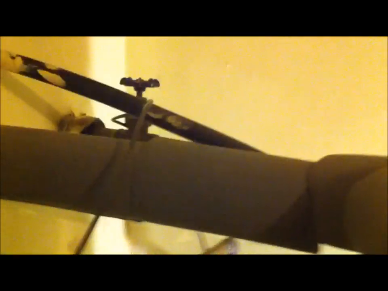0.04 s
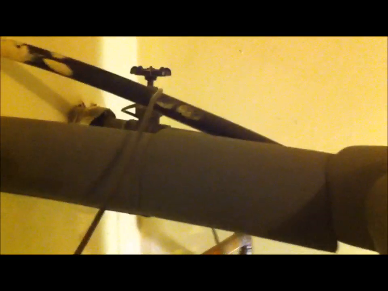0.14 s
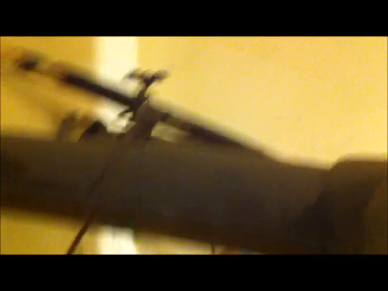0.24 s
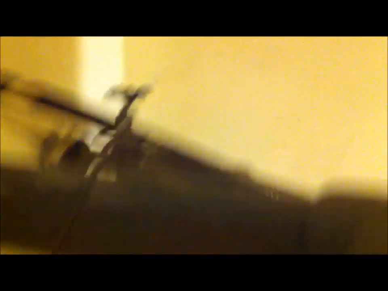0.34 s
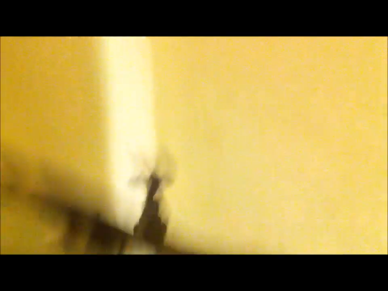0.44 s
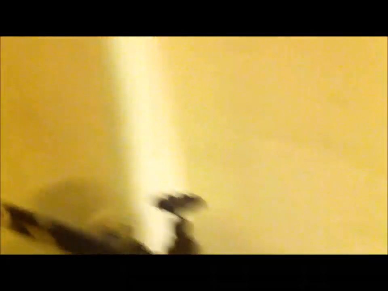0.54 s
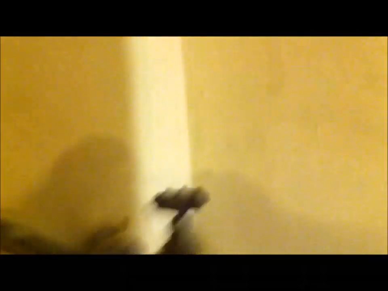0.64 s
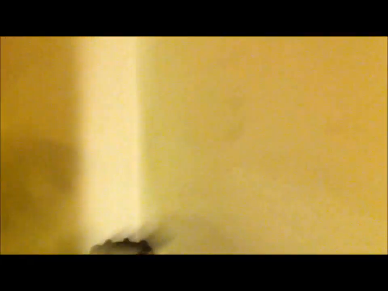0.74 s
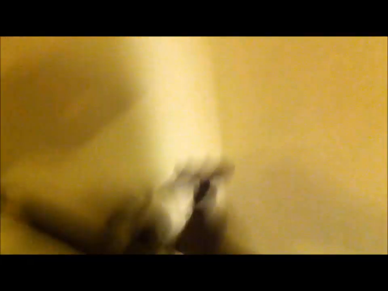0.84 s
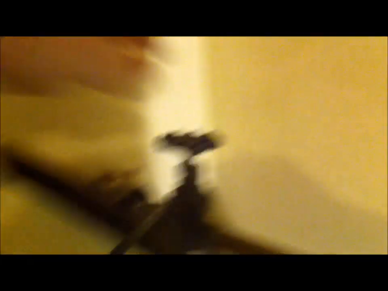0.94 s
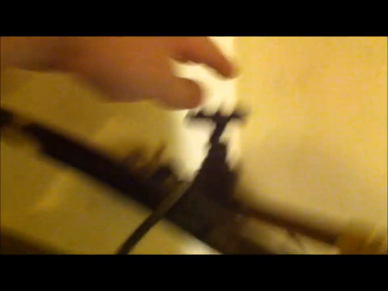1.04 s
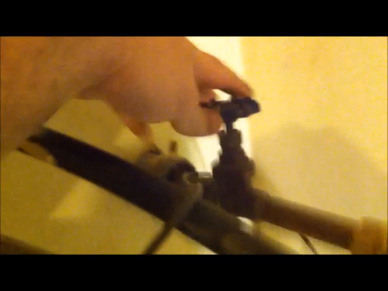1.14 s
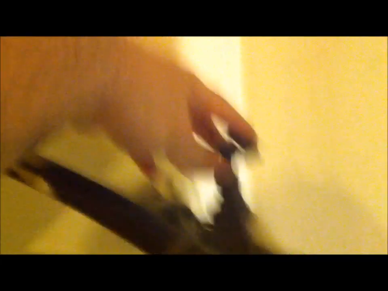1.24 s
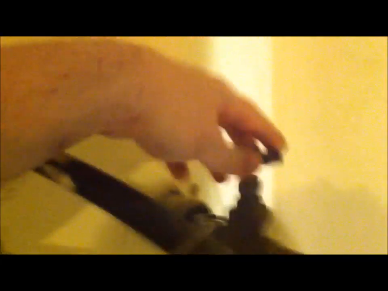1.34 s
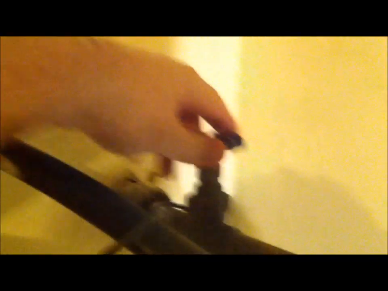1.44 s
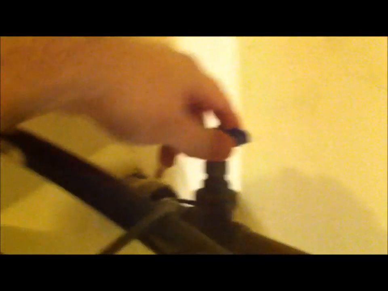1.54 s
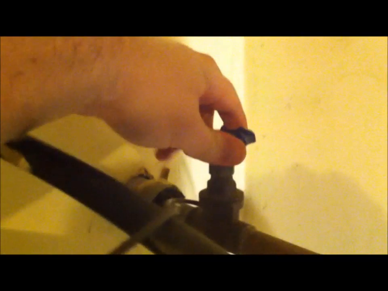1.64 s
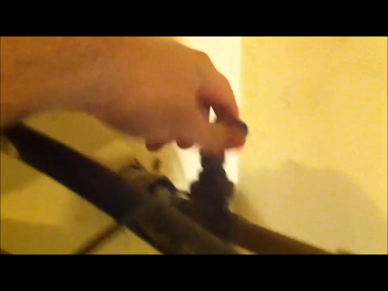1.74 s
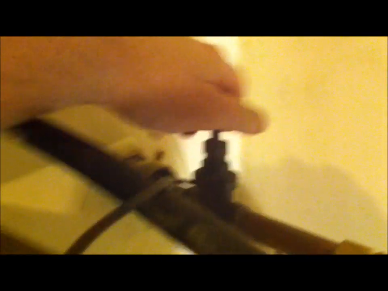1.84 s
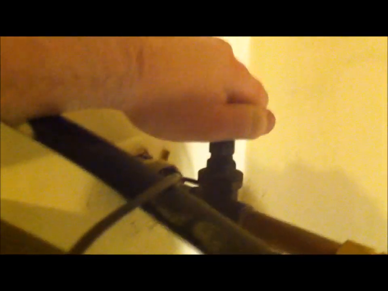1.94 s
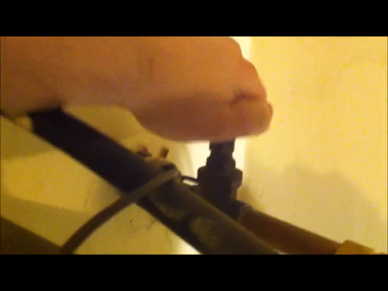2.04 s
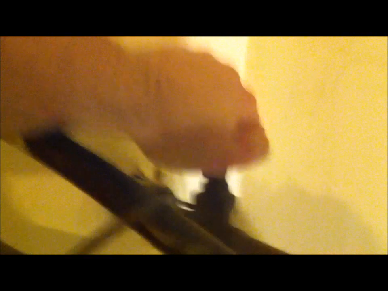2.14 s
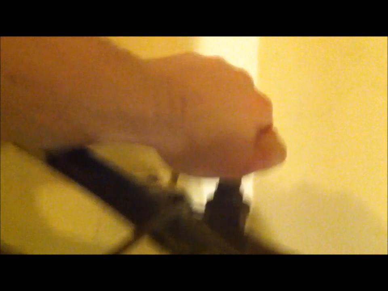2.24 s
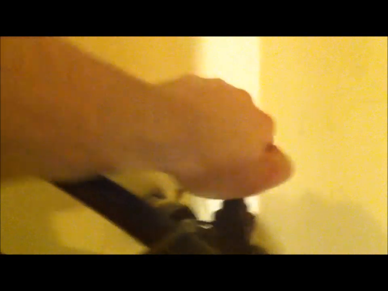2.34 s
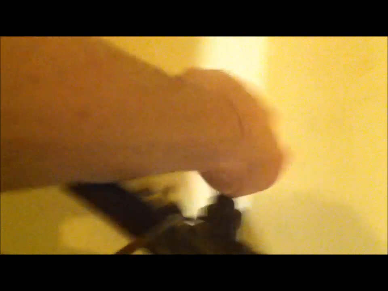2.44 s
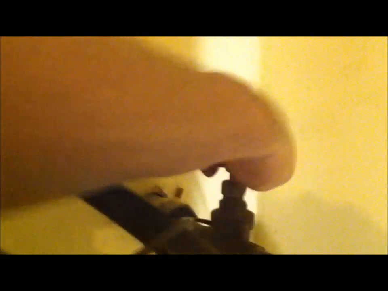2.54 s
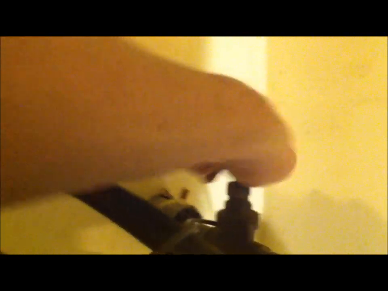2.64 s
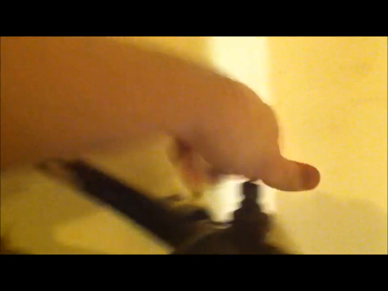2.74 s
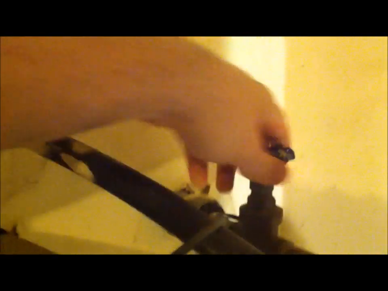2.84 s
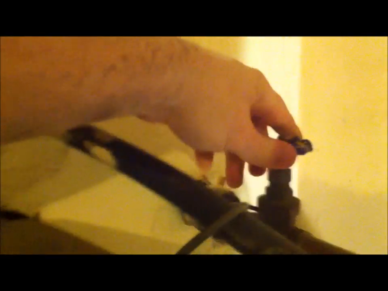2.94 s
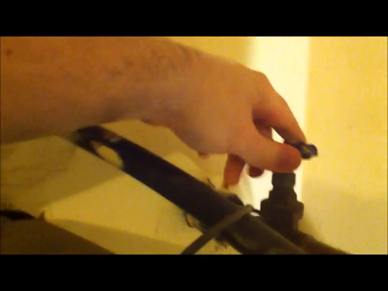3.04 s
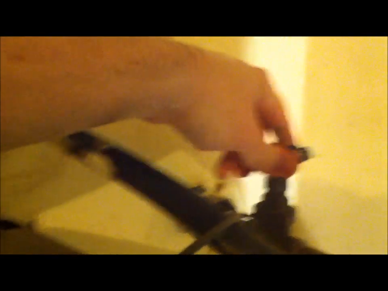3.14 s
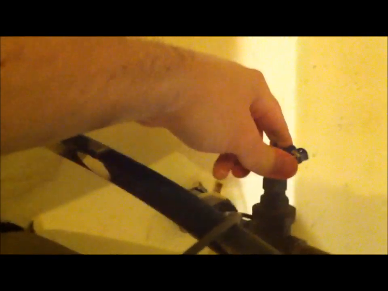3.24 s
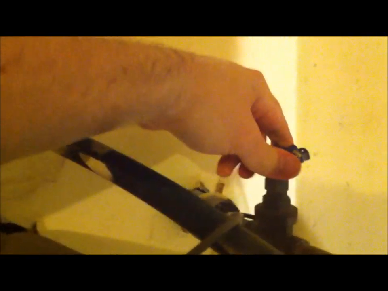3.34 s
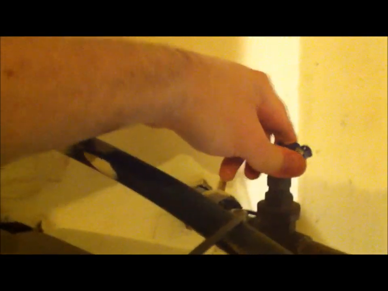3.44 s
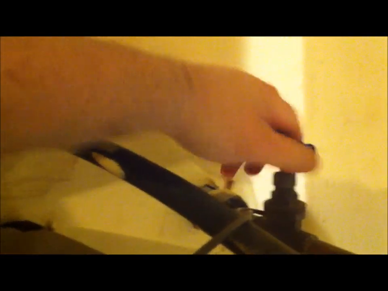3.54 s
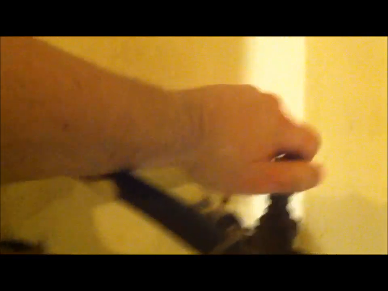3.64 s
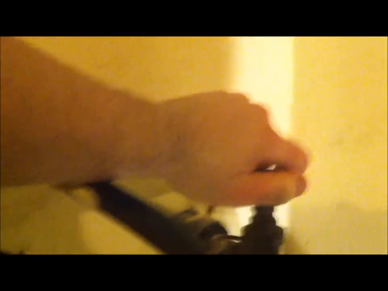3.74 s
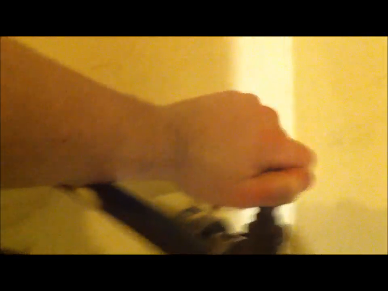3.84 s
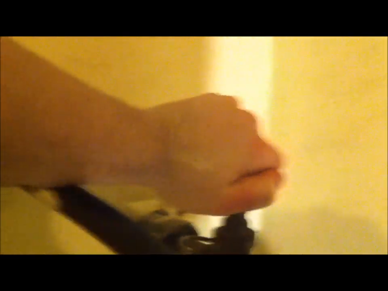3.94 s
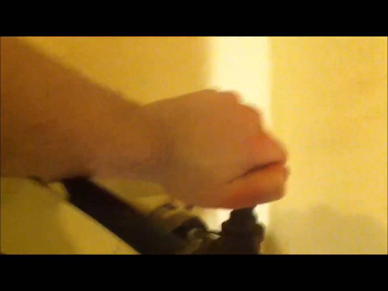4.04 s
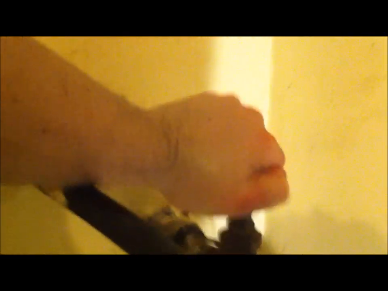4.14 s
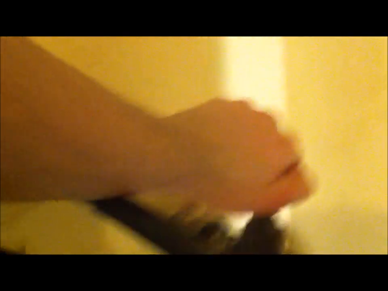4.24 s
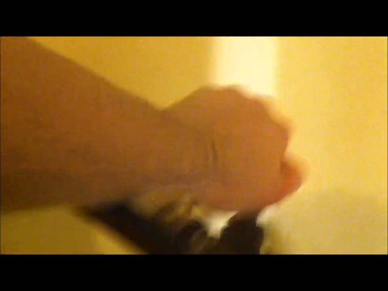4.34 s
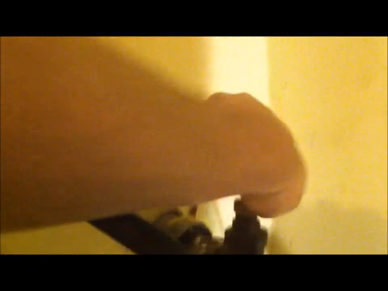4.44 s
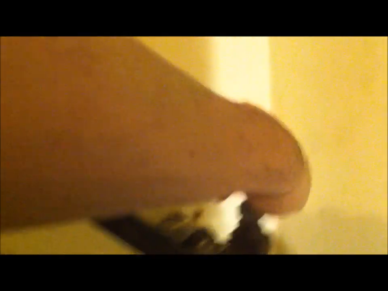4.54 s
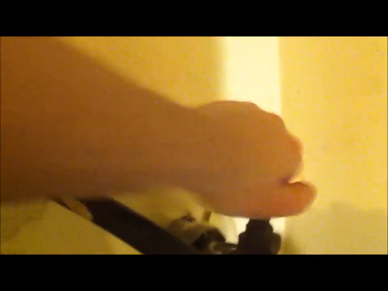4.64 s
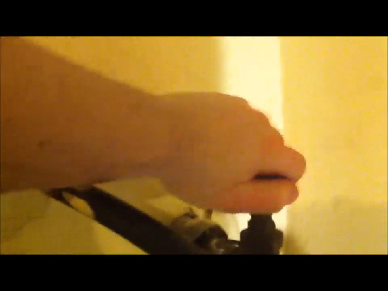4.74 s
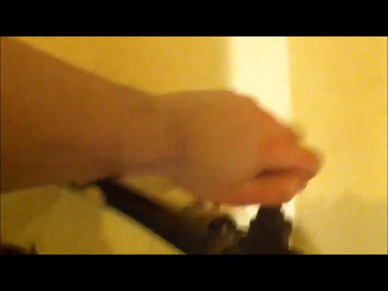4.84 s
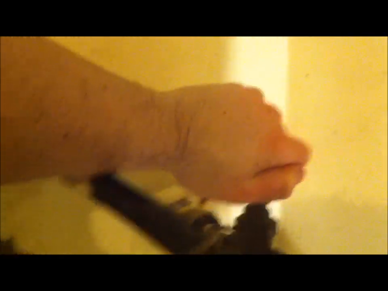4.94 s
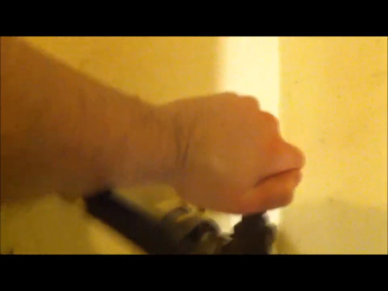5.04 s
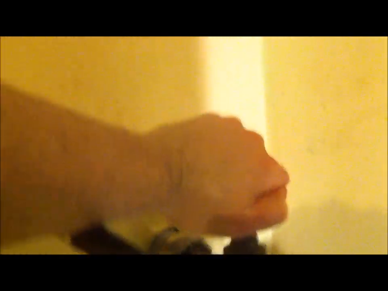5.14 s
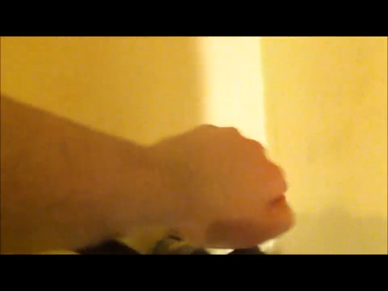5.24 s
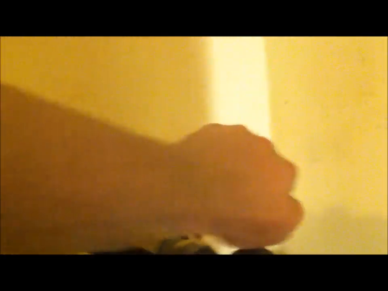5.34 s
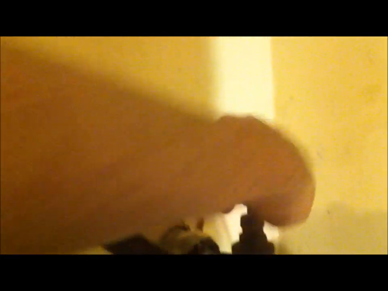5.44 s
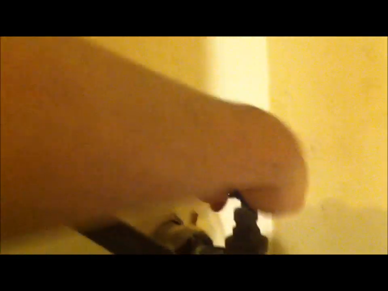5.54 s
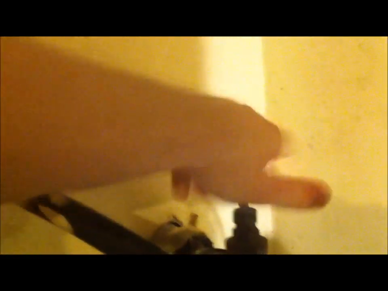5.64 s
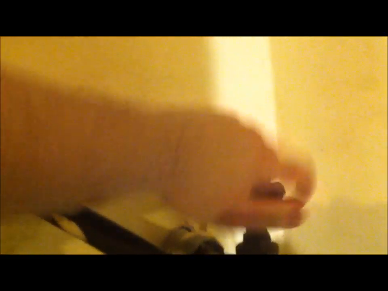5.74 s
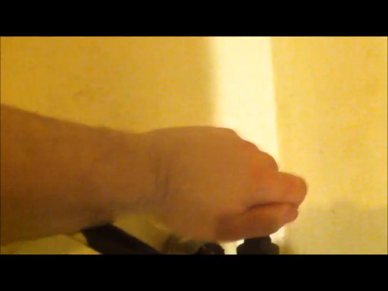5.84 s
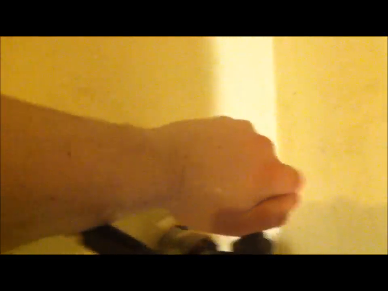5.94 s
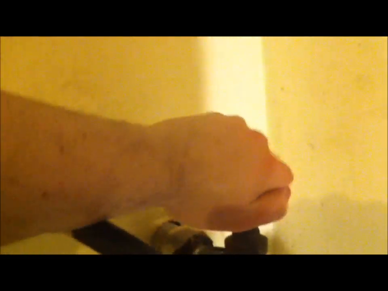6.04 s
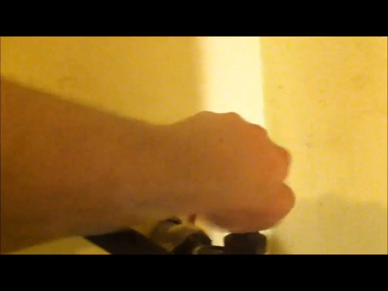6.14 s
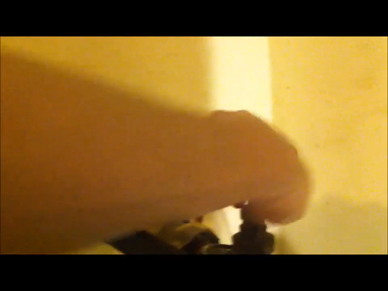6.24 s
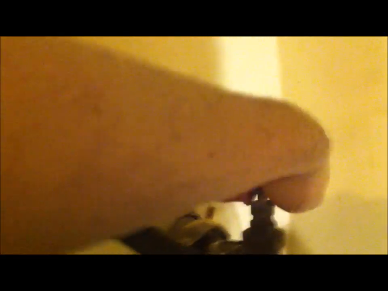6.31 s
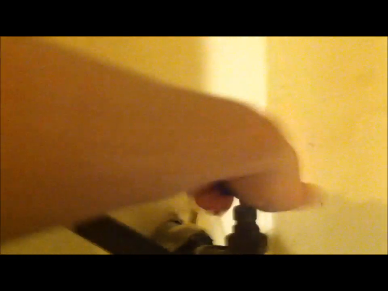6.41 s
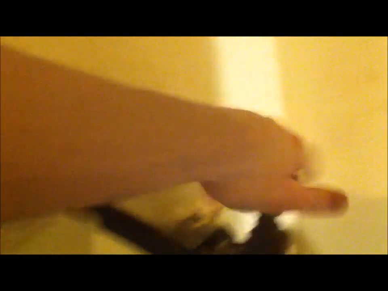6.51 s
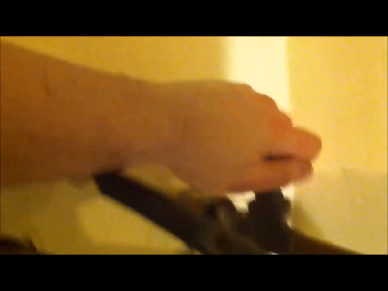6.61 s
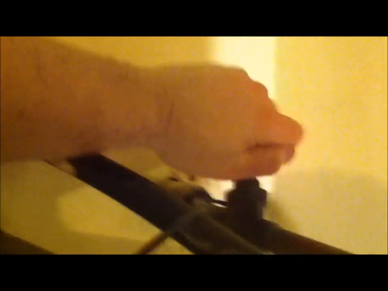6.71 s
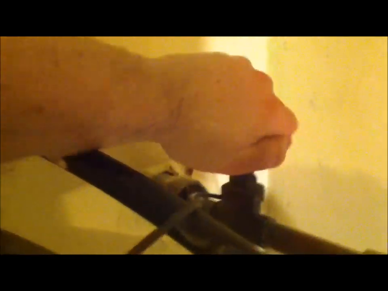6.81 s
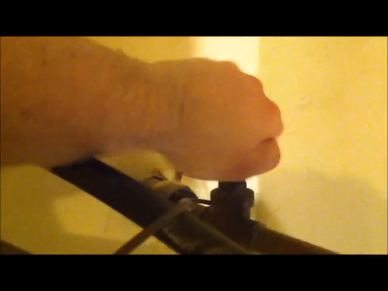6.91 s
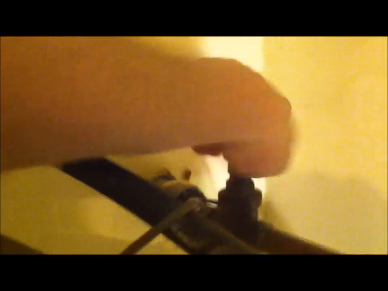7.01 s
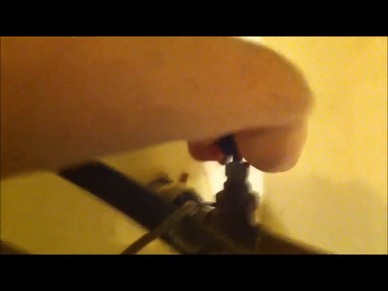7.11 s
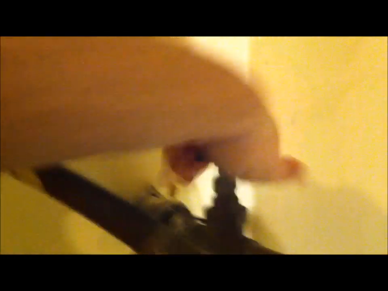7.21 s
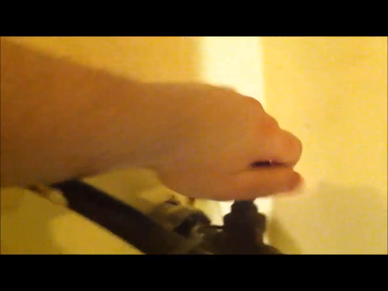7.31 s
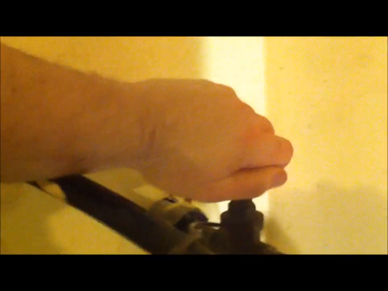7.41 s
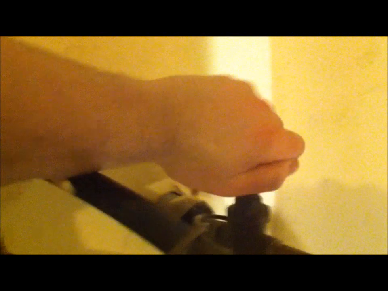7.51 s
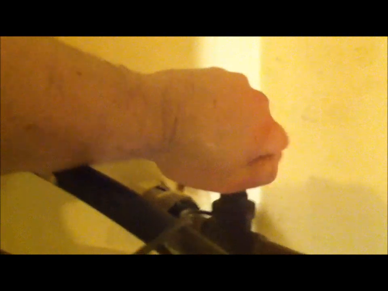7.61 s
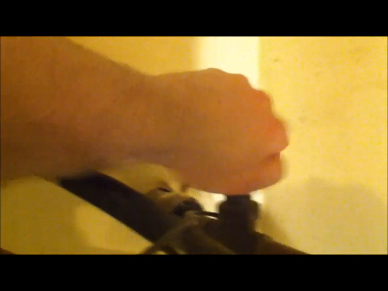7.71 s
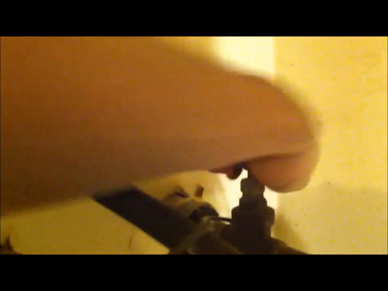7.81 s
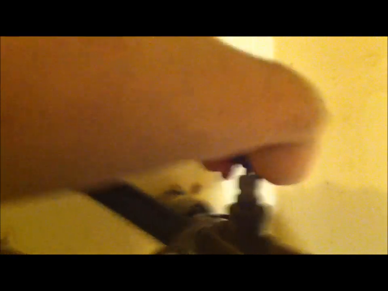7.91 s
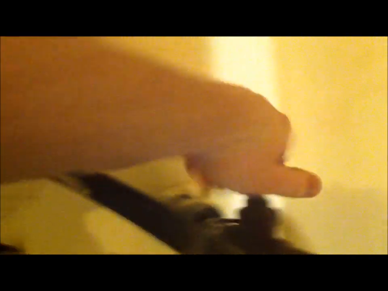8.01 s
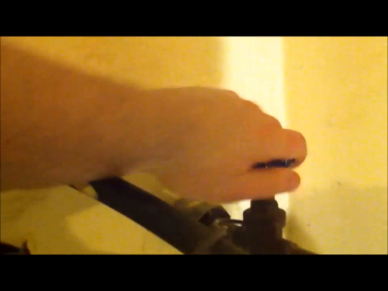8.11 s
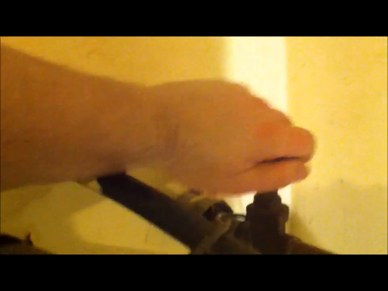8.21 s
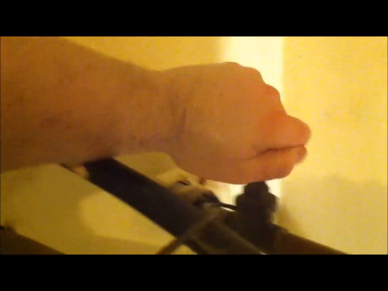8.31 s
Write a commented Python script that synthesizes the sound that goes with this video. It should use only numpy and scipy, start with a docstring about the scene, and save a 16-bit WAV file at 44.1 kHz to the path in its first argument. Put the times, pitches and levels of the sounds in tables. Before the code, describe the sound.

A hand-held microphone near a water valve catches a hollow knock with bright cracks, faint hissing seepage, and sparse metallic taps, bumps and rubs. After about four seconds the valve opens: a harsh jet hisses, whistles and swells into a resonant pipe roar, dips and sputters, then cuts away to low churning water with bubbles and small gulps. Reflective little room, no voices.

```python
"""In a small hard-walled room, close to a microphone, a hand turns the tap of a water valve.
Pipes clatter (struck modes, noise cracks); a thin hiss (resonant noise) stops once the hand takes hold.
Handle taps, clicks, bumps and rubs are struck modes and filtered noise bursts; one pop is a filtered impulse.
A noise jet then roars in the pipe's modes, hisses and whistles at the seat, with short sung notes.
It dies to a softer churning flow: coloured noise, gliding bubbles and gulps. Both channels are the same."""
import sys
import numpy as np
from scipy import signal
from scipy.fft import rfft, irfft
from scipy.io import wavfile
from scipy.ndimage import uniform_filter1d

SR = 44100
rng = np.random.default_rng(int(sys.argv[2]) if len(sys.argv) > 2 else 0)


def wrap_up_sound(samples):
    """Save the sound to the file named by the first command line argument, as 16-bit audio."""
    columns = np.atleast_2d(samples).T
    # keep every value between -1 and 1, then stretch to whole-number steps
    tamed = np.clip(columns, -1, 1)
    steps = np.round(tamed * 32767).astype(np.int16)
    wavfile.write(sys.argv[1], SR, steps)


N = 369116
TIME = np.arange(N) / SR
BINS_HZ = np.fft.rfftfreq(8192, 1 / SR)
BRIEF = TIME[:SR // 2]  # time axis of one hit, s

# Levels below are relative, ahead of the layer gains and the room mix.

# murmur of room and plumbing (f/Hz, level/dB)
QUIET_COLOUR = [(18, -70), (30, -24), (145, -9.5), (345, -9.5), (404, -10.5), (866, -13), (1130, -16.5),
                (1500, -16), (2000, -20.5), (2750, -21.5), (3140, -23.5), (3980, -21), (12000, -24),
                (16000, -26)]
# its resonances (f/Hz, width/Hz, level/dB)
QUIET_MODES = [(883, 24, -3), (3210, 140, -18), (6100, 250, -23.5), (9460, 240, -14)]
QUIET_DB = -58

# hiss of the nearly shut valve (f/Hz, level/dB)
SEEP_COLOUR = [(71, -26), (120, -13), (892, -16), (1030, -15), (1680, -7.5), (2400, -6.5), (3520, -1.5),
               (5200, -5), (7050, -5.5), (8100, -3.5), (9590, 2.5), (11200, -14.5), (13000, -8),
               (16000, -26)]
# valve resonances in that hiss (f/Hz, width/Hz, level/dB)
SEEP_MODES = [(564, 72, -6), (3124, 114, 5.5), (3360, 60, -6), (3464, 70, 5), (3614, 130, 2),
              (4390, 106, 3.5), (4670, 67, 1), (5900, 81, -12), (6770, 150, -9), (8670, 370, -6),
              (9450, 120, 5.5), (9850, 28, 5), (9700, 59, 6.5), (10800, 110, -8), (11830, 180, -4.5),
              (12300, 83, -7), (12900, 320, -13)]
# steady until the first turn pinches it off
SEEP_DB, SEEP_STOP_S, SEEP_RELEASE_S = -47.5, 2.596, 0.13
# resonances come forward as the microphone nears the valve: 1.5 x the shift, then 0.5 x
SEEP_NEAR_S, SEEP_APPROACH_S, SEEP_SHIFT_DB = 0.49, 0.22, -5.5
SEEP_TONE_HZ, SEEP_TONE_WIDTH_HZ, SEEP_TONE_DB = 1671, 32, -64

# clatter against the pipes (t/s, body level/dB, crack level/dB)
KNOCKS = [(0.002, -34, -60), (0.0199, -27, -56), (0.1093, -24.5, -57), (0.12, -18.5, -26),
          (0.1264, -27, -20), (0.1303, -22.5, -23.5), (0.1664, -26, -53), (0.1712, -32, -35),
          (0.1747, -22.5, -34.5), (0.185, -31, -49)]
# hollow thud of a knock (f/Hz, level/dB)
KNOCK_COLOUR = [(40, -27), (120, -36), (200, -10), (260, -8.5), (450, -13.5), (650, -5.5), (900, 4.5),
                (1300, -6.5), (1800, -4.5), (2700, -18.5), (4000, -22), (7000, -28), (14000, -49)]
# struck pipe modes (f/Hz, level/dB, t60/s)
KNOCK_MODES = [(503, -7, 0.05), (636, 6, 0.045), (846, 6, 0.091), (945, -3, 0.16), (1230, -9.5, 0.17),
               (1683, -5, 0.31)]
# hard front of the crack (f/Hz, level/dB)
CRACK_COLOUR = [(1470, -79), (2500, -24), (4210, 5), (4730, -3), (5830, 8.5), (9290, 2), (10400, 12),
                (12500, -9), (16000, -6)]
# what follows that front (f/Hz, level/dB)
CRACK_RING_COLOUR = [(1500, -48), (2600, -14), (4200, 1), (6000, 6), (9700, 0), (12000, -20), (16000, -37)]

# sharp metal clicks in the valve (t/s, stem level/dB, seat level/dB)
CLICKS = [(0.346, -44, -57), (0.43, -45, -64), (1.518, -33.5, -36), (1.533, -35.5, -48), (3.204, -55, -55),
          (3.678, -48.5, -42), (4.095, -55, -51), (4.2104, -53, -45.5), (4.366, -44, -42)]
# stem when struck (f/Hz, width/Hz, level/dB)
STEM_MODES = [(935, 460, -7.5), (3510, 650, 1), (4380, 120, -1), (5450, 810, -15), (6860, 620, -0.5)]
# seat when struck (f/Hz, width/Hz, level/dB)
CLICK_MODES = [(8600, 2000, -5), (9700, 610, 5), (9940, 2100, 9), (12000, 700, -1), (14100, 990, -2)]
# dull bumps carried by the pipe (t/s, level/dB, f/Hz)
BUMPS = [(0.547, -55, 165), (1.529, -51, 155), (2.344, -43.5, 152), (2.527, -52, 192), (2.82, -53, 154),
         (3.778, -41, 153), (4.174, -42.5, 278), (5.04, -30, 208), (5.211, -35, 235)]
# loose handle taps on its stem (t/s, level/dB, thud re ring/dB)
TAPS = [(1.906, -42.5, -18), (3.217, -33, -15), (3.365, -33, -10), (3.62, -57, -2), (3.653, -51, 2),
        (3.817, -43.5, -15), (3.841, -43, -6), (3.948, -48, -2), (4.031, -44.5, -8), (4.084, -49, 1.5),
        (4.129, -40, -17), (4.172, -39.5, -5), (4.196, -50, -4), (4.256, -51, 0)]
# handle modes (f/Hz, level/dB, t60/s)
HANDLE_MODES = [(892, 6, 0.13), (910, -21, 0.06), (650, -22, 0.025), (1260, -14, 0.08), (275, -16, 0.15),
                (2320, -16, .045)]
# thud beside the ring (f/Hz, level/dB)
THUD_COLOUR = [(80, -11), (280, -15), (900, 1.5), (1500, -9), (2300, -19), (3000, -25), (8000, -67)]
# handle rings freely, then the fingers damp it
TAP_FREE_S, TAP_DAMP_S, TAP_DAMP_DB = 0.034, 0.007, -12
# washer snapping off its seat (f/Hz, width/Hz, level/dB)
UNSEAT_MODES = [(1330, 450, -2), (4000, 600, 2), (6260, 900, -6), (9450, 1800, -7), (13000, 4000, -10)]
UNSEAT_S, UNSEAT_DB, UNSEAT_T60_S = 4.335, -36.5, 0.035

# brief tones: thin valve and pipe notes, and fuzzy scuffs near 740 Hz as the hand rubs (middle t/s, half
# length/s, f/Hz, width/Hz, level/dB)
NOTES = [(0.452, 0.07, 2360, 14, -58), (1.21, 0.029, 746, 97, -43), (2.634, 0.045, 733, 130, -57.5),
         (3.565, 0.11, 1682, 22, -56), (4.444, 0.048, 6300, 260, -41), (4.5, 0.042, 3050, 140, -48),
         (4.62, 0.054, 6200, 295, -32), (4.74, 0.04, 5050, 266, -25.5), (4.749, 0.015, 1300, 54, -22.5),
         (4.787, 0.05, 6250, 63, -30), (6.6, 0.1, 4580, 260, -35.5), (6.71, 0.08, 890, 40, -38)]
# one dry pop (t/s, level/dB)
POPS = [(0.777, -22)]
# its spectrum (f/Hz, level/dB)
POP_COLOUR = [(60, -26), (150, -18), (300, 1.5), (600, -0.5), (1000, -2.5), (1600, -8), (2500, -22),
              (6000, -46)]

# hand and stem rub (middle t/s, half length/s, skin level/dB, thread level/dB, packing level/dB)
RUBS = [(1.208, 0.025, -43.5, -41.5, -48), (1.998, 0.034, -58.5, -75, -73), (2.213, 0.18, -58.5, -69, -58),
        (2.313, 0.039, -58, -72, -54), (3.48, 0.054, -56.5, -80, -69), (3.916, 0.011, -51.5, -55.5, -62),
        (4.012, 0.021, -54, -51.5, -63), (4.199, 0.014, -53, -52, -59)]
# soft push of skin (f/Hz, level/dB)
RUB_COLOUR = [(90, -44), (208, -3.5), (399, -4.5), (600, -1), (764, -2.5), (980, -4), (1400, -7),
              (2000, -13), (3000, -30), (8000, -60)]
# dry scrape of the thread (f/Hz, level/dB)
GRIT_COLOUR = [(300, -27), (1200, -5), (2000, 0), (3100, -1), (5000, -1), (9400, -9), (15000, -14)]
# packing as it drags (f/Hz, width/Hz, level/dB)
PACKING_MODES = [(1370, 300, -5), (1660, 240, 0.5), (2040, 250, -6)]
# handle chatters as it turns (middle t/s, half length/s, level/dB)
RATTLES = [(3.824, 0.058, -57), (4.103, 0.11, -50.5)]
# soft drag through the opening turn
TURN_MID_S, TURN_HALF_S, TURN_DB = 4.1, 0.28, -65.5

# water running along the pipe (f/Hz, level/dB)
FLOW_COLOUR = [(29, -73), (50, -51), (175, -7.5), (337, -6), (450, -11.5), (590, -4.5), (745, -5),
               (884, -0.5), (1010, -10.5), (1240, -3.5), (1580, -10), (2380, -10), (3400, -15), (4400, -21),
               (7950, -28), (9640, -25.5), (16000, -54)]
# its resonances (f/Hz, width/Hz, level/dB)
FLOW_MODES = [(340, 40, -4.5), (580, 53, 3), (633, 86, 1.5), (890, 71, 9), (1050, 33, 3.5), (1255, 61, -2),
              (1765, 50, -1), (10000, 280, -18)]
FLOW_START_S, FLOW_RISE_S, FLOW_DB = 4.23, 0.51, -43
# extra churn and bubbles, rising as the jet fades
CHURN_START_S, CHURN_RISE_S, CHURN_DB = 6.4, 0.98, 2.5
# first slug of water hitting the pipe (f/Hz, level/dB, t60/s)
SLUG_MODES = [(530, -2, 0.041), (664, -0.27, 0.056), (785, -2, 0.056)]
SLUG_S, SLUG_DB = 4.379, -36.5
# larger gulps of water in the pipe (t/s, f/Hz, level/dB)
GULPS = [(7.115, 570, -42), (7.127, 2360, -33), (7.34, 1046, -34), (7.357, 790, -30), (7.378, 576, -32),
         (7.673, 900, -31), (7.689, 1090, -30), (7.758, 648, -32), (7.89, 970, -33.5), (8.049, 2430, -38),
         (8.131, 2000, -37), (8.165, 3050, -35)]
BUBBLE_LOW_HZ, BUBBLE_HIGH_HZ, BUBBLES_PER_S = 556, 2330, 83
BUBBLE_T60_CYCLES, BUBBLE_GLIDE_PER_S, BUBBLE_DB = 20, 3.1, -9.5

# jet strength at the seat as the tap is turned (t/s, level/dB)
JET = [(4.358, -84), (4.368, -48.5), (4.44, -39.5), (4.495, -41.5), (4.514, -34), (4.54, -37.5),
       (4.626, -30), (4.67, -30.5), (4.745, -28), (5.1, -28.5), (5.56, -30), (5.8, -26.5), (6.25, -27.5),
       (6.37, -37.5), (6.415, -46.5), (6.435, -36), (6.465, -42), (6.5, -34.5), (6.61, -34), (6.69, -35.5),
       (6.81, -31.5), (7.02, -33), (7.11, -71)]
# share of the full roar, i.e. gap width (t/s, share 0-1)
FULLNESS = [(4.4, 0.44), (4.9, 0.18), (5.3, 0.85), (5.7, 0.94), (6.25, 0.93), (6.5, 0), (7.1, 0.13)]
# broad roar between the resonances (f/Hz, level/dB)
ROAR_COLOUR = [(40, -59), (90, -56), (115, -42), (150, -24.5), (220, -14.5), (300, -31), (400, -13.5),
               (560, -17), (740, -35), (1020, -22), (1400, -9.5), (1900, -13.5), (2300, -11.5),
               (2700, -12.5), (3600, -28), (4700, -10.5), (6000, -23), (8000, -50)]
# pipe resonances (f/Hz, width/Hz, narrow-gap level/dB, full-roar level/dB)
PIPE_MODES = [(609, 28, -2, -8.5), (825, 32, -2, -3), (890, 47, 4.5, 0.5), (1127, 92, -2, 2.5),
              (1300, 77, 2.5, -1), (1500, 38, -2.5, -2.5), (1624, 70, -9, 2), (1720, 72, -2, 0),
              (2136, 112, -16, -1.5), (2380, 190, -5.5, -8), (2988, 79, -6, 2.5), (3195, 100, -7, -4),
              (3492, 76, -4.5, 0), (3710, 56, -0.5, -2.5), (3950, 90, -9, -6), (4180, 170, -5.5, -1)]
# jet hiss (f/Hz, level/dB)
HISS_COLOUR = [(1760, -29.5), (3000, -6.5), (3730, -15), (4290, -11.5), (6000, -4.5), (7460, -5),
               (8760, -0.5), (9600, 4), (10700, -9), (14100, -13.5), (16000, -25)]
# valve body in the hiss (f/Hz, width/Hz, level/dB)
HISS_MODES = [(3124, 155, 0), (3650, 50, -15), (4380, 59, 2), (4700, 125, 5.5), (5250, 270, 1),
              (5810, 70, 6), (6320, 77, 1), (6840, 150, -2), (7610, 190, -13)]
# seat whistle (f/Hz, width/Hz, level/dB)
SEAT_MODES = [(8960, 230, -7), (9400, 100, 3), (9490, 180, 7.5), (9625, 57, 8.5), (9430, 50, -1),
              (9660, 25, 10), (9800, 130, 2), (9950, 240, -3), (10580, 260, -16)]
# fine fizz around the whistle (f/Hz, level/dB)
SPRAY_COLOUR = [(5000, -44), (8500, -19), (10500, -8), (13000, -15), (15500, -24)]
# whistle flares as the seat catches the jet (middle t/s, lift/dB)
FLARES = [(4.514, 5.1), (4.578, 2.3), (4.694, 6.2), (4.712, 2.6), (4.96, 6.2)]
FLARE_HALF_S = 0.014
JET_REF_DB = -27
# level at reference strength; growth in dB per dB of jet
ROAR_DB, ROAR_GROWTH = -26, 1.73
WHISTLE_DB, WHISTLE_GROWTH = -21.5, 0.79
# level changes at fullness 1
WHISTLE_WIDE_DB, RUMBLE_DB, RUMBLE_WIDE_DB = -7.5, -30, 9.5
SPUTTER_DB, SPUTTER_HZ = 1.44, 94  # depth is scaled by (0.5 - fullness)
SURGE_RMS_DB, DRIFT_RMS_HZ = 2, 14  # per pipe resonance

# room decay (f/Hz, t60/s)
ROOM_T60 = [(150, 0.91), (900, 0.52), (2000, 0.58), (6000, 0.2), (14000, 0.32)]
# depth of the room's standing waves (f/Hz, depth/dB)
STANDING_DB = [(300, 0.5), (1000, 2), (2500, 2.5), (6000, 2.5), (9500, 2.5), (13000, 4)]
LOW_CUT_HZ, EDGE_HZ = 77, 15800


def amp(db):
    """Decibels to gain."""
    return 10 ** (np.asarray(db) / 20)


def evened(x):
    """Scales to rms 1."""
    return x / np.sqrt(np.mean(x ** 2) + 1e-20)


def read(points, hz):
    """Interpolates (f/Hz, value) points on a log-frequency axis."""
    f, value = np.transpose(points)
    return np.interp(np.log(hz + 1), np.log(f + 1), value)


def level(rows):
    """Gain curve from (t/s, level/dB) rows, -120 dB outside their span."""
    return amp(np.interp(TIME, *np.transpose(rows), left=-120, right=-120))


def ramp(start_s, length_s):
    """Straight rise from 0 to 1."""
    return np.clip((TIME - start_s) / max(length_s, 1e-3), 0, 1)


def swell(mid_s, half_s):
    """Bell-shaped rise and fall."""
    return np.exp(-((TIME - mid_s) / half_s) ** 2)


def stroke(mid_s, half_s):
    """Rise and fall with long skirts, as pressure builds and eases."""
    return 1 / (1 + np.abs((TIME - mid_s) / half_s) ** 2)


def add(mix, s, sound):
    """Mixes a sound in at time s."""
    part = mix[max(round(s * SR), 0):][:len(sound)]
    part += sound[:len(part)]


def shape(points):
    """Gain per bin of a smooth spectrum."""
    return amp(read(points, BINS_HZ))


def resonance(hz, centre_hz, width_hz, db):
    """Power response of a resonance with steep skirts."""
    return amp(db) ** 2 / (1 + 2.6 * ((hz - centre_hz) / width_hz) ** 2) ** 2


def peaks(modes):
    """Gain per bin of a set of resonances, summed in power."""
    return np.sqrt(sum(resonance(BINS_HZ, hz, width, db) for hz, width, db in modes))


def colour(x, gain):
    """Minimum-phase filter with the given gain per bin, scaled to a peak of 1."""
    log_gain = np.log(np.maximum(gain / gain.max(), 1e-5))
    circle = np.concatenate([log_gain, log_gain[-2:0:-1]])
    taps = np.fft.ifft(np.exp(np.conj(signal.hilbert(circle)))).real
    return signal.oaconvolve(x, taps[:len(BINS_HZ)])[:len(x)]


def wander(rate_hz, size=N):
    """Slow random curve of rms 1, rolled off above rate_hz."""
    hz = np.fft.rfftfreq(size, 1 / SR)
    spectrum = rfft(rng.standard_normal(size)) / (1 + (hz / rate_hz) ** 4)
    return evened(irfft(spectrum, size))


def smoothed(x, size, axis):
    """Moving average along one axis."""
    return uniform_filter1d(x, size=size, axis=axis)


def turbulence(patchy_db, flicker_db, flicker_hz):
    """Noise whose bands swell in short patches while the whole of it flickers."""
    z = signal.stft(rng.standard_normal(N), nperseg=1024)[2]
    patches = evened(smoothed(smoothed(rng.standard_normal(z.shape), 12, axis=0), 4, axis=1))
    noise = signal.istft(z * amp(patchy_db * patches), nperseg=1024)[1][:N]
    return evened(noise * amp(flicker_db * wander(flicker_hz)))


def bursts(per_s, spread_db):
    """Random train of impulses of uneven size and either sign; rms 1."""
    size = amp(spread_db * np.minimum(rng.exponential(1, N), 4))
    sign = rng.choice([-1, 1], N)
    return evened(size * sign * (rng.random(N) < per_s / SR))


def dying(t60_s):
    """Envelope that falls 60 dB in t60_s."""
    return np.exp(-np.log(1000) * BRIEF / max(t60_s, 1e-3))


def burst(gain, t60_s):
    """Decaying coloured noise with the energy of its envelope."""
    envelope = dying(t60_s)
    x = colour(rng.standard_normal(len(BRIEF)) * envelope, gain)
    return x / np.sqrt(np.sum(x ** 2) / np.sum(envelope ** 2))


def ring(modes, rise_s):
    """Struck modes that build up over the contact time; peak 1."""
    x = sum(amp(db) * dying(t60) * np.sin(2 * np.pi * (hz * BRIEF + rng.random()))
            for hz, db, t60 in modes)
    x = x * (1 - np.exp(-BRIEF / rise_s))
    return x / abs(x).max()


def room(x):
    """Diffuse tail off the walls, each band dying at its own speed."""
    late_noise = rng.standard_normal(SR) * (TIME[:SR] > .004)
    hz, t, z = signal.stft(late_noise, SR, nperseg=256)
    decay = np.exp(-np.log(1000) * t / read(ROOM_T60, hz)[:, None])
    tail = signal.istft(z * decay, SR, nperseg=256)[1]
    return signal.fftconvolve(x, tail / np.linalg.norm(tail))[:N]


def standing(x):
    """Standing waves between hard walls: peaks and dips drift as the hand-held microphone moves."""
    hz, t, z = signal.stft(x, SR, nperseg=1024)
    ripple = evened(smoothed(smoothed(rng.standard_normal(z.shape), 2, axis=0), 24, axis=1))
    ripple_db = read(STANDING_DB, hz)[:, None] * np.clip(ripple, -2, 1.6)
    return signal.istft(z * amp(ripple_db), SR, nperseg=1024)[1][:N]


def quiet():
    """Low murmur of the room and the plumbing over an even hiss: coloured noise."""
    gain = shape(QUIET_COLOUR) + amp(0.5) * peaks(QUIET_MODES)
    drive = turbulence(patchy_db=1.2, flicker_db=0.55, flicker_hz=30)
    return amp(QUIET_DB) * evened(colour(drive, gain))


def seep():
    """Water squeezed through a narrow gap hisses in the valve's resonances, with a thin whine."""
    drive = turbulence(patchy_db=1.0, flicker_db=0.4, flicker_hz=20)
    held = 1 - ramp(SEEP_STOP_S - SEEP_RELEASE_S, SEEP_RELEASE_S)
    near = amp(SEEP_SHIFT_DB * (1.5 - ramp(SEEP_NEAR_S, SEEP_APPROACH_S)))
    resonant = near * colour(rng.standard_normal(N), peaks(SEEP_MODES))
    hiss = evened(colour(drive, shape(SEEP_COLOUR)) + amp(11) * resonant)
    tone_gain = peaks([(SEEP_TONE_HZ, SEEP_TONE_WIDTH_HZ, 0)])
    tone = evened(colour(rng.standard_normal(N), tone_gain))
    return held * (amp(SEEP_DB) * hiss + amp(SEEP_TONE_DB) * tone)


def clatter():
    """Each knock is a hollow thud, a bright crack with a hard front, and the ring of the pipes."""
    out = np.zeros(N)
    for s, body_db, crack_db in KNOCKS:
        thud = burst(shape(KNOCK_COLOUR), t60_s=0.1) * (0.7 + 0.7 * dying(0.03))
        body = thud + amp(-0.5) * ring(KNOCK_MODES, rise_s=0.001)
        front = burst(shape(CRACK_COLOUR), t60_s=0.013)
        after = burst(shape(CRACK_RING_COLOUR), t60_s=0.053)
        crack = amp(4.5) * front + amp(-6) * after
        add(out, s, amp(body_db) * body + amp(crack_db) * crack)
    return out


def handle():
    """Struck parts: clicks in the valve, dull pipe bumps, damped handle taps, the washer's snap."""
    out = np.zeros(N)
    for s, stem_db, seat_db in CLICKS:
        stem = burst(peaks(STEM_MODES), t60_s=0.059)
        seat = burst(peaks(CLICK_MODES), t60_s=0.091)
        add(out, s, amp(stem_db) * stem + amp(seat_db) * seat)
    for s, db, hz in BUMPS:
        add(out, s, amp(db) * ring([(hz, 0, .1), (hz * 1.59, -5, .08)], rise_s=0.0042))
    damping = amp(TAP_DAMP_DB * ramp(TAP_FREE_S, TAP_DAMP_S)[:len(BRIEF)])
    for s, db, thud_db in TAPS:
        thud = burst(shape(THUD_COLOUR), t60_s=0.1) * (1 - dying(0.003))
        tap = ring(HANDLE_MODES, rise_s=0.0018) + amp(thud_db) * thud
        add(out, s, amp(db) * damping * tap)
    add(out, UNSEAT_S, amp(UNSEAT_DB) * burst(peaks(UNSEAT_MODES), UNSEAT_T60_S))
    return out


def notes():
    """Brief tones with jittering pitch: thin when the jitter is small, fuzzy when it is wide."""
    out = np.zeros(N)
    for s, half, hz, width, db in NOTES:
        turns = np.cumsum(hz + .5 * width * wander(width)) / SR
        out += amp(db) * swell(s, half) * np.sin(2 * np.pi * turns)
    return out * amp(0.73 * wander(59))


def pop():
    """A dry, heavily damped pop close to the microphone: a filtered impulse."""
    out = np.zeros(N)
    pulse = colour(signal.unit_impulse(len(BRIEF)), shape(POP_COLOUR))
    for s, db in POPS:
        add(out, s, amp(db) * pulse / abs(pulse).max())
    return out


def grainy(gain):
    """Friction noise: random fluctuation of level, then the surface's spectrum."""
    return evened(colour(rng.standard_normal(N) * amp(1.6 * wander(130)), gain))


def rubs():
    """Skin, thread and packing slide in grainy strokes, and the loose handle chatters."""
    skin, grit = grainy(shape(RUB_COLOUR)), grainy(shape(GRIT_COLOUR))
    packing = grainy(peaks(PACKING_MODES))
    out = amp(TURN_DB) * swell(TURN_MID_S, TURN_HALF_S) * skin
    for s, half, skin_db, grit_db, packing_db in RUBS:
        rub = amp(skin_db) * skin + amp(grit_db) * grit + amp(packing_db) * packing
        out += stroke(s, half) * rub
    shaking = sum(amp(db) * swell(s, half) for s, half, db in RATTLES)
    chatter_gain = peaks([(540, 290, 2), (930, 120, 10.5), (1330, 130, 0.0)])
    chatter = evened(colour(bursts(per_s=190, spread_db=0.5), chatter_gain))
    return out + shaking * chatter


def flow():
    """Water churns along the pipe: a first slug, then gurgling bubbles and a few larger gulps."""
    collapses = bursts(per_s=570, spread_db=2.0)
    drive = turbulence(patchy_db=2.0, flicker_db=1.0, flicker_hz=33) + amp(-7.0) * collapses
    churning = ramp(CHURN_START_S, CHURN_RISE_S)
    gain = ramp(FLOW_START_S, FLOW_RISE_S) * amp(FLOW_DB + CHURN_DB * churning)
    churn = evened(colour(drive, shape(FLOW_COLOUR) + amp(-9.5) * peaks(FLOW_MODES)))
    out = gain * (churn + amp(BUBBLE_DB) * churning * bubbles())
    add(out, SLUG_S, amp(SLUG_DB) * ring(SLUG_MODES, rise_s=0.002))
    for s, hz, db in GULPS:
        add(out, s, amp(db) * ring([(hz, 0, .05), (hz * 0.937, -4, .04)], rise_s=0.00057))
    return out


def jet():
    """The cavitating jet drives the pipe's modes, hisses, and makes the seat whistle."""
    jet_gain = level(JET)
    strength = jet_gain / amp(JET_REF_DB)
    full = np.clip(np.interp(TIME, *np.transpose(FULLNESS)), 0, 1)

    collapses = bursts(per_s=900, spread_db=2.5)
    drive = turbulence(patchy_db=2.0, flicker_db=0.5, flicker_hz=120) + amp(-9.5) * collapses
    rumble_drive = turbulence(patchy_db=2.0, flicker_db=0.0, flicker_hz=15)
    rumble = evened(colour(rumble_drive, peaks([(148.4, 28, 0), (217, 44, 0), (300, 60, -4.5)])))
    rumble_gain = amp(RUMBLE_DB + RUMBLE_WIDE_DB * full)
    roar_gain = amp(ROAR_DB) * strength ** ROAR_GROWTH
    roar = roar_gain * (pipe(drive, full) + rumble_gain * rumble)

    hiss_drive = turbulence(patchy_db=0.8, flicker_db=0.98, flicker_hz=60)
    hiss_shape = shape(HISS_COLOUR) + amp(-4.5) * peaks(HISS_MODES)
    hiss = amp(2.5) * jet_gain * evened(colour(hiss_drive, hiss_shape))

    whistle_drive = turbulence(patchy_db=1.5, flicker_db=1.55, flicker_hz=7.4)
    flare_db = sum(db * swell(s, FLARE_HALF_S) for s, db in FLARES)
    whistle_db = WHISTLE_DB + WHISTLE_WIDE_DB * full + flare_db
    whistle_gain = amp(whistle_db) * strength ** WHISTLE_GROWTH
    whistle = whistle_gain * evened(colour(whistle_drive, peaks(SEAT_MODES) + shape(SPRAY_COLOUR)))

    # level flicker, none at half fullness
    sputter = amp(SPUTTER_DB * (0.5 - full) * wander(SPUTTER_HZ))
    return sputter * (roar + hiss + whistle)


def pipe(drive, full):
    """The jet rings the pipe: a wider gap feeds other resonances, and each surges on its own."""
    hz, t, z = signal.stft(drive, SR, nperseg=2048, noverlap=1536)
    centre, width, narrow_db, wide_db = np.transpose(PIPE_MODES)
    grid = (len(t), len(centre))
    surge = evened(smoothed(rng.standard_normal(grid), 10, axis=0))
    drift = evened(smoothed(rng.standard_normal(grid), 16, axis=0))
    opening = np.interp(t, TIME, full)[:, None]
    mode_db = narrow_db + opening * (wide_db - narrow_db) + SURGE_RMS_DB * surge
    pitch = centre + DRIFT_RMS_HZ * drift
    power = sum(resonance(hz, f[:, None], w, db[:, None])
                for f, w, db in zip(pitch.T, width, mode_db.T))
    power = power + amp(read(ROAR_COLOUR, hz)) ** 2
    return evened(signal.istft(z * np.sqrt(power.T), nperseg=2048, noverlap=1536)[1][:N])


def bubbles():
    """Each size of bubble rings for a few cycles and rises in pitch, at random moments."""
    out, t = np.zeros(N), BRIEF[:SR // 10]
    for hz in np.geomspace(BUBBLE_LOW_HZ, BUBBLE_HIGH_HZ, 20):
        turns = hz * (t + .5 * BUBBLE_GLIDE_PER_S * t ** 2)
        envelope = dying(BUBBLE_T60_CYCLES / hz)[:len(t)] * (1 - np.exp(-t * hz))
        blip = np.sin(2 * np.pi * turns) * envelope
        starts = bursts(per_s=BUBBLES_PER_S / 20, spread_db=-1.0)
        out += signal.oaconvolve(starts, blip)[:N]
    return evened(out)


def scene():
    """All sources, with room tail on water, knocks and hand; the same in both channels."""
    water = standing(seep() + jet() + flow()) + notes()
    knocks = clatter()
    hand = handle() + rubs()
    wet = room(amp(-8.5) * water + amp(-12.5) * knocks + amp(-12.5) * hand)
    mono = amp(-0.84) * water + knocks + hand + wet + pop() + standing(quiet())
    return np.array([mono, mono])


def record(dry):
    """The small microphone's bass roll-off, then the band limit."""
    bass_cut = signal.butter(2, LOW_CUT_HZ, "highpass", fs=SR, output="sos")
    thin = signal.sosfilt(bass_cut, dry)
    band_limit = signal.firwin(511, EDGE_HZ, window=("kaiser", 9), fs=SR)
    return signal.oaconvolve(thin, band_limit[None], "same")


dry = scene()
out = record(dry)
wrap_up_sound(out)
```